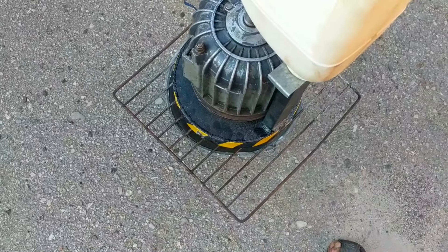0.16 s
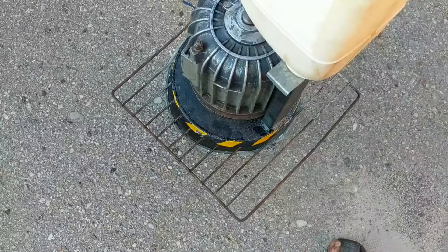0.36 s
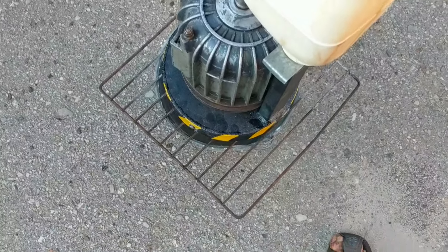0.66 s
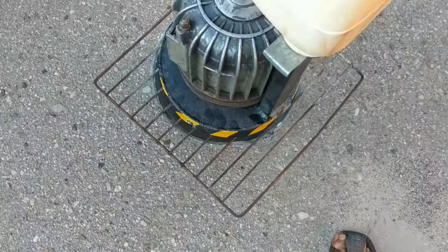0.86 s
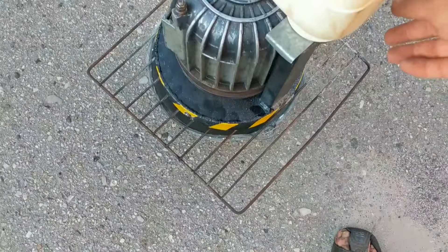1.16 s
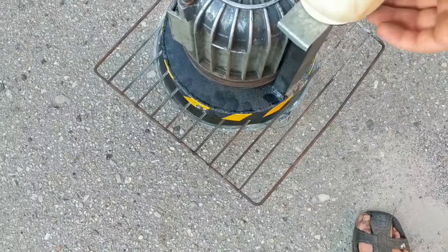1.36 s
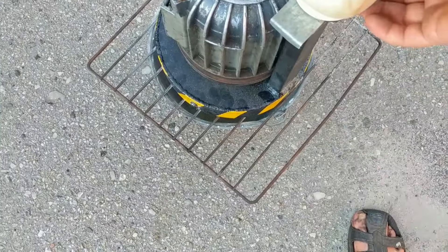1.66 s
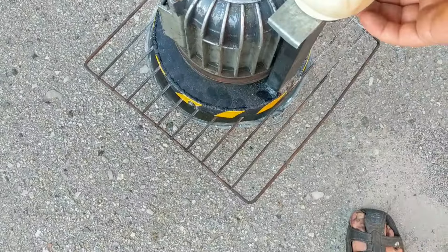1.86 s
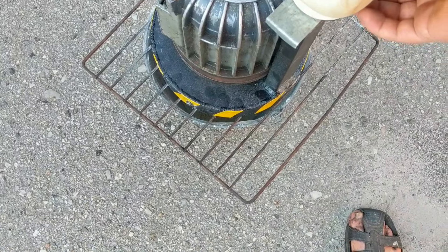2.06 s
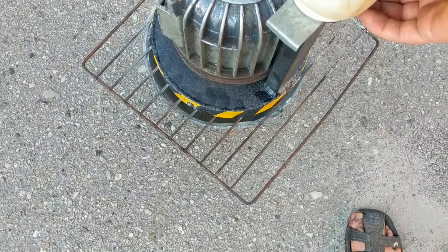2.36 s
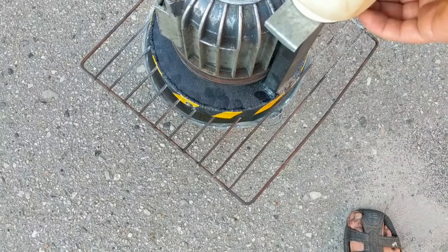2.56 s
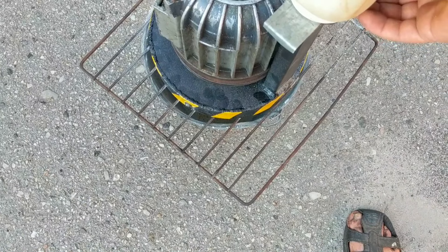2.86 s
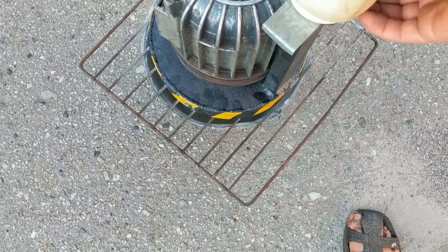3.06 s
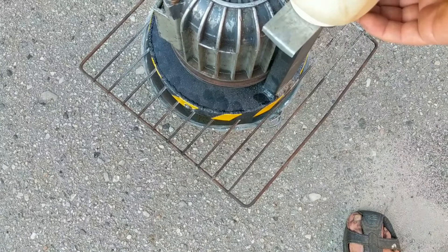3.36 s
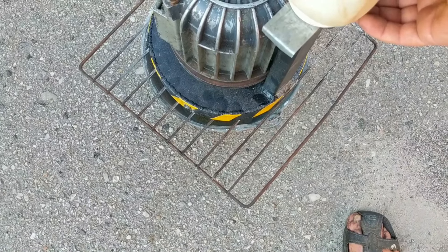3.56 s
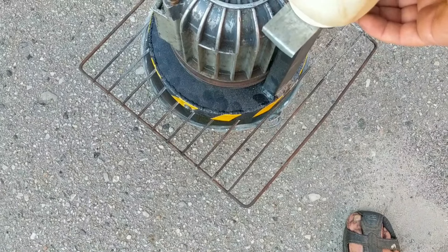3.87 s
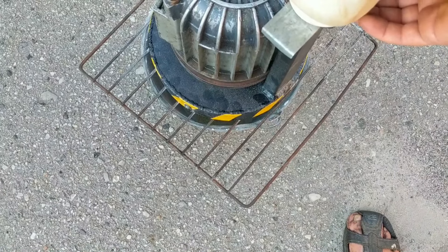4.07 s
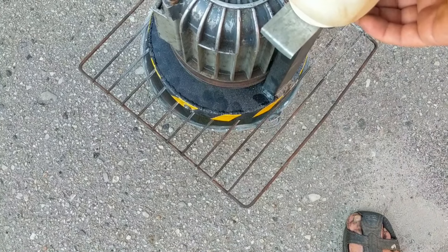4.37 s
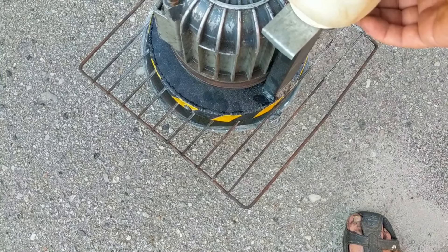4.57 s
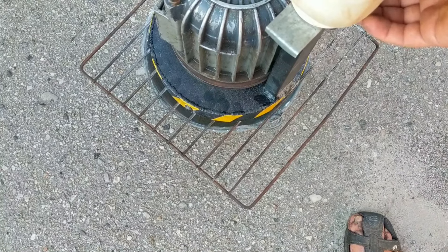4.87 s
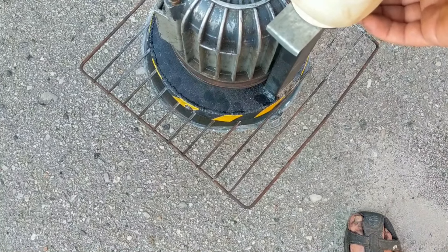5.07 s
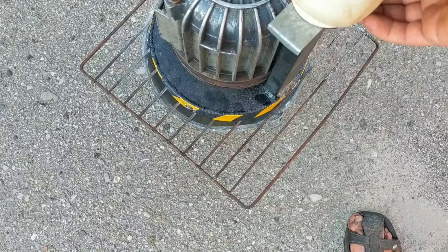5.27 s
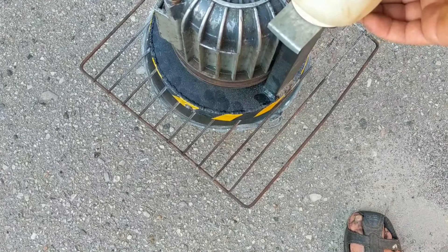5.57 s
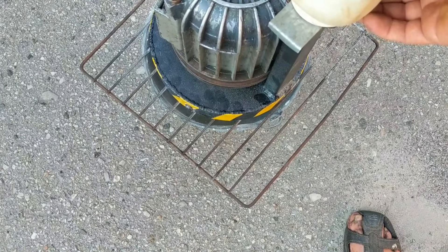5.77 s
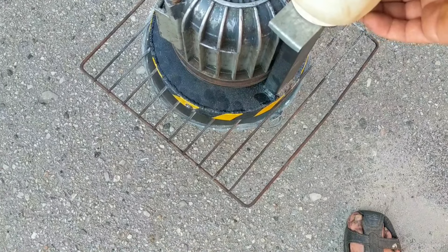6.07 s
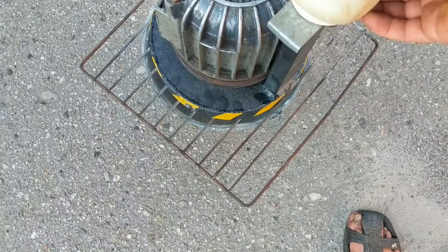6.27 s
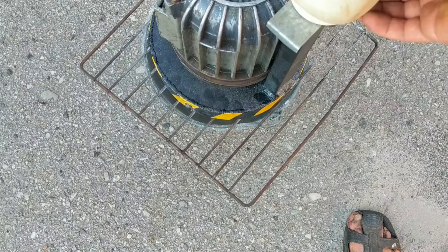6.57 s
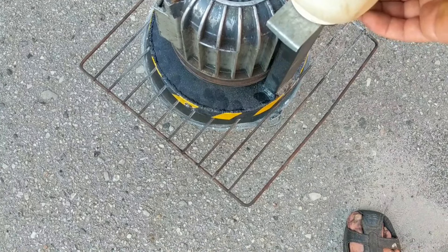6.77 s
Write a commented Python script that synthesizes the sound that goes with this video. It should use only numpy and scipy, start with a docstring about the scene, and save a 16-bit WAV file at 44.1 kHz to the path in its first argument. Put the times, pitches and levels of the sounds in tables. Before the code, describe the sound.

A homemade electric mill runs outdoors, heard from above through one microphone. At first a steady gritty, metallic hiss rides on a wavering motor hum, with isolated kernel cracks. Stepping closer brings brief, gliding metallic rings. The cracks gradually become more frequent, then at about four and a half seconds the feed opens and grain pours in, swelling to a loud, dense, rattling grind that lasts to the end.

```python
"""Electric grain mill, from single kernels to full feed

A homemade mill is heard from above, outdoors, through one microphone, as the listener steps closer.
Random blows and hiss, shaped by drum resonances, make the dust and chips swept round the steel.
Decaying bursts of the same noise crack single kernels, until the feed opens to a dense stream of corn.
Wavering sines and low noise make the motor; gliding bands of noise make rings that swell and pass."""
import sys
import numpy as np
from scipy import signal
from scipy.fft import rfft, irfft, next_fast_len
from scipy.io import wavfile
from scipy.ndimage import uniform_filter1d

SR = 44100
rng = np.random.default_rng(int(sys.argv[2]) if len(sys.argv) > 2 else 0)


def master(y):
    """Save y as 16-bit WAV."""
    cut = np.clip(np.atleast_2d(y).T, -1, 1)
    pcm = np.round(cut * 32767)  # scale
    wavfile.write(sys.argv[1], SR, pcm.astype(np.int16))


N = 305613
T = np.arange(N) / SR


def amp(db):
    """Decibels to gain."""
    return 10 ** (np.asarray(db) / 20)


def rms_one(x):
    """Scale to rms 1."""
    return x / np.sqrt(np.mean(x ** 2) + 1e-20)


def in_time(rows):
    """Turn a table whose first column is time into one curve per remaining column."""
    time_s, *columns = np.transpose(rows)
    return [np.interp(T, time_s, column) for column in columns]


def drift(rate_hz):
    """Slow random movement of rms 1: noise at every 40th sample through two equal one-pole low-passes."""
    r = np.exp(-80 * np.pi * rate_hz / SR)
    coarse = rng.standard_normal(N // 40 + 2002)
    slow = signal.lfilter([1], [1, -2 * r, r * r], coarse)[2000:]   # drop the filter's run-in
    return np.interp(np.arange(N) / 40, np.arange(len(slow)), rms_one(slow))


def wavering_tone(level_db, phase):
    """Sine whose level is given as rms."""
    return np.sqrt(2) * amp(level_db) * np.sin(phase)


def colour(x, spectrum, hollows=()):
    """Shape by a smooth spectrum with bell-shaped hollows."""
    size = next_fast_len(N)
    hz = np.maximum(np.arange(size // 2 + 1) * SR / size, 1)
    points = np.array(spectrum)
    db = np.interp(np.log(hz), np.log(points[:, 0]), points[:, 1])
    for at_hz, width_hz, depth_db in hollows:
        db = db + depth_db * np.exp(-(2 * (hz - at_hz) / width_hz) ** 2)
    return irfft(rfft(x, size) * amp(db), size)[:N]


def resonance(x, hz, width_hz):
    """Two-pole peak with gain 1 on top."""
    r = np.exp(-np.pi * width_hz / SR)
    poles = [1, -2 * r * np.cos(2 * np.pi * hz / SR), r * r]
    return signal.lfilter(np.array([1, 0, -1]) * (1 - r * r) / 2, poles, x)


# when each move begins and ends, in seconds
STEP_CLOSER_S, FEED_OPENS_S = (.68, 1.3), (4.45, 4.75)
TREBLE_TURNS_S = (1.45, 1.7)   # the modes above 7800 Hz come into view last


def by_state(far, close, full, step_s=STEP_CLOSER_S):
    """A value that passes from far to close as the listener steps up, then to full as the feed opens."""
    return np.interp(T, list(step_s) + list(FEED_OPENS_S), [far, close, close, full])


# broad colour of the blows: pitch_hz, relative level_db per Hz
RATTLE = [(150, -40), (250, 0), (399, -6.5), (483, 3), (574, -6.5), (855, -5), (1190, -5), (1620, 4.5),
          (3140, -1.5), (3420, -3), (4830, -3), (5270, -4.5), (7990, -4), (10700, -2), (15700, 4)]
# where the steel radiates little: pitch_hz, width_hz, gain_db
HOLLOWS = [(1270, 92, -0.5), (2420, 220, -1), (3107, 113, -6), (3710, 140, -1), (7980, 1360, -4),
           (8600, 140, 0), (10100, 120, -4), (12900, 500, -2), (13550, 250, -3), (15400, 400, -1)]


def stream_of_blows(per_s, spread_db, hiss):
    """Chips hit the steel at random with uneven force, over a hiss of flour and air."""
    force = amp(spread_db * np.minimum(rng.exponential(1, N), 5)) * rng.choice([-1, 1], N)
    hits = force * (rng.random(N) < per_s / SR)
    blows = rms_one(rms_one(hits) + hiss * rng.standard_normal(N))
    return colour(blows, RATTLE, HOLLOWS)


# edges of the five registers, body, lid, drum wall, grit and fine grit: pitch_hz
REGISTERS_HZ = [280, 1200, 3100, 7800, 11600, 17000]
# how much grain the rotor is beating, relative to the nearly empty mill: time_s, load_db
LOAD = [(0, 0), (.45, -1.5), (.75, -1), (1.6, 0.5), (3.0, 0), (4.45, -0.5), (4.6, 3), (4.75, 6.5), (4.9, 6),
        (5.05, 7), (5.2, 8), (5.4, 8.5), (5.47, 6.5), (5.55, 8), (5.9, 7), (5.98, 7), (6.2, 7.5),
        (6.3, 7.5), (6.45, 6.5), (6.55, 6), (6.7, 7), (6.93, 6.5)]
# roar of the nearly empty mill, one entry a register: level_db from further back, level_db close
ROAR_FAR_DB = [-44.5, -39, -35.5, -41.5, -45.5]
ROAR_CLOSE_DB = [-45, -42.5, -36.5, -41.5, -45.5]
# how far the roar follows the load, one entry a register: share (dB per dB)
ROAR_FOLLOWS = [0.91, 1.36, 1.134, 0.75, 0.91]
# modes of steel drum, lid and chute, one mode a column: pitch_hz
STEEL_HZ = [390, 482, 712, 840, 905, 1420, 1520, 1636, 1796, 1944, 2100, 2206, 2525, 2815, 3515, 3909, 4317,
            4578, 5150, 5302, 5490, 5943, 6280, 7140, 7270, 8600, 9560, 9780, 10220, 10380, 10922, 11060,
            11850, 12150, 12370, 13180, 13780, 14500]
# the same modes: width_hz
STEEL_WIDTH_HZ = [38.4, 46.3, 95, 36, 84.6, 30.2, 44, 74, 22, 37, 92, 37, 51, 130, 68, 246, 55, 35, 75.4,
                  95, 87, 32, 160, 60, 69.6, 300, 90, 120, 110, 90, 60, 70, 200, 50, 45, 45, 50, 400]
# mode gain beside the broad rattle, before levelling; rows: far_db, close_db, full_db (drum full of corn)
STEEL_DB = [
    [1.5, -3, 10.7, 1.9, 2.5, 4.9, 5.8, 9.4, 1.5, 12, 1.5, 1.1, 3.1, 5.1, 0.81, 4.3, 3.8, 1.3, 2.8, 12.4,
     2.4, 4.2, 2, 6, 1.2, -18, 0, 7, 5.7, 5, -8, 2, 0, -5, -5, 0, 0, -4],
    [1.5, 0, 5.9, 12.4, 5.4, 9.4, 1.6, 4.7, 1.3, 6.8, 3.1, 1.5, 4, 6.3, 6.8, 3.2, 5.3, 2.5, 6, 7.9, 2.6,
     1.5, 0.71, 6.5, 3.2, 2, 5, 6.5, 6.6, 7, 10, 4, -3, 4, 2, 6, 6, 1],
    [5, 0.5, 1.7, 0.5, 10, 7.5, 6.2, 7.3, 5.5, 6.3, 2.9, 2.4, 1.6, 0.41, 5.9, 1.9, 2.7, 3.2, 1, 7.2, 2, 2.5,
     1.2, 2.4, 4.4, 1, -2, 3, 1, 2, 2, 2, -1, -4, 4, 2, -2, 2],
]
SWEEP_HZ, SWEEP_DB = 49.75, .65   # two beaters on a shaft turning at half this rate


def mill(surge_db):
    """Each register of the steel is driven by the stream of blows plus the cracks."""
    phase = 2 * np.pi * SWEEP_HZ * T + .3 * drift(1)
    sweep = np.cos(phase) + .5 * np.cos(2 * phase) + .12 * np.cos(3 * phase)   # the beaters pass the chute
    surge = surge_db * drift(30) + SWEEP_DB * sweep   # grain arrives in clumps
    stream = stream_of_blows(per_s=5000, spread_db=3.5, hiss=1.3)
    load_db, cracks = in_time(LOAD)[0], all_cracks()
    out = np.zeros(N)
    for k, (far, close, share) in enumerate(zip(ROAR_FAR_DB, ROAR_CLOSE_DB, ROAR_FOLLOWS)):
        low, high = REGISTERS_HZ[k:k + 2]
        level_db = by_state(far, close, close) + share * load_db
        steady = amp(2 * (level_db + surge + .96 * drift(20.3)))   # doubled dB: power
        power = steady + crack_power(cracks, k)
        sound = np.sqrt(power) * stream
        step_s = TREBLE_TURNS_S if k > 2 else STEP_CLOSER_S
        for hz, width_hz, far_db, close_db, full_db in zip(STEEL_HZ, STEEL_WIDTH_HZ, *STEEL_DB):
            if low <= hz < high:
                mode_db = by_state(far_db, close_db, full_db, step_s)
                flicker = amp(4.5 * drift(16) + 1.5 * drift(1.5))   # chips land now here, now there
                drive = steady * flicker + crack_power(cracks, k, mode_hz=hz, favour_db=12.5)
                sound += amp(mode_db) * resonance(np.sqrt(drive) * stream, hz, width_hz)
        band = signal.sosfilt(signal.butter(4, [low, high], "band", fs=SR, output="sos"), sound)
        # over half a second the register keeps its level, whichever modes carry it
        wanted = uniform_filter1d(power, size=SR // 2)
        present = uniform_filter1d(band ** 2, size=SR // 2)
        out += band * np.sqrt(wanted / present)
    return out


# wavering motor tones, one a column; several lie about one shaft turn apart and beat: pitch_hz
HUM_HZ = [100, 192.8, 199.96, 217.65, 224.8, 232.1, 242.5, 256.9, 323, 463, 646, 705, 722, 770, 1944, 2787,
          2810, 5040]
# the same tones, rms before waver and swell; rows: far_db, close_db, full_db (under load)
HUM_DB = [
    [-67, -59.5, -65, -60, -67, -71, -74, -76, -78, -60, -61, -63, -58, -72, -67, -70, -72, -73],
    [-70, -58.5, -61.5, -60, -65, -73, -76, -67, -68, -58, -61, -67, -64, -63, -56.5, -60, -57, -77],
    [-77, -68.5, -63, -68, -62.5, -66, -64, -60.5, -57, -54, -59, -55, -54.5, -66, -51, -66, -73, -50],
]
# the same tones, rms of the level's random waver: waver_db
HUM_WAVER_DB = [2.5, 1, 1, 1, 1, 1, 1, 1, 3, 3, 4, 3, 3, 3,  3, 3, 3, 3, 3]
# clearest motor tone, rms before waver: time_s, level_db
WHINE = [(0, -57), (.3, -62), (.8, -56), (1.1, -51), (1.25, -62), (1.55, -54), (1.9, -58), (2.2, -54),
         (2.7, -51), (2.85, -62), (3.05, -51), (3.75, -52), (3.9, -61), (4.2, -55), (4.5, -56), (4.7, -66),
         (6.93, -66)]
# deep tone that comes and goes, rms before waver: time_s, level_db
LOW_HUM = [(0, -72), (.25, -72), (1.2, -68), (1.4, -64.5), (3.65, -64), (4.0, -73), (6.93, -78)]
# rumble colour: pitch_hz, relative level_db per Hz
RUMBLE = [(12, -48), (20, -21), (65, -12.5), (140, -7), (199, -5), (227, 0), (283, -11.5), (330, -42),
          (430, -79), (730, -120)]
# the motor's voice swells and sinks slowly: time_s, tones_db, rumble_db
MOTOR_SWELL = [(0, -1, 0), (1.1, -2, 3.5), (1.9, -1.5, 2), (2.4, -1.5, 2), (3.7, -2.5, 1.5), (4.2, -1.5, 6),
               (5.0, -4, -1), (5.8, 1.5, 0), (6.4, -0.5, 0), (6.93, -0.5, 0)]
WHINE_HZ, LOW_HUM_HZ = 488.5, 61
RUMBLE_DB, RUMBLE_FOLLOWS = -59.5, .88   # rms before load, swell and lumps; dB per dB of load
THROB_PEAK_S = .07   # the beating tones near 200 Hz first meet here


def motor():
    """Beating tones over a lumpy rumble that grows with the load."""
    tones_swell_db, rumble_swell_db = in_time(MOTOR_SWELL)
    wander = .5 * drift(2)   # radians, shared by the tones and the whine
    tones = np.zeros(N)
    for hz, waver_db, *state_db in zip(HUM_HZ, HUM_WAVER_DB, *HUM_DB):
        level_db = by_state(*state_db) + waver_db * drift(4.3)
        phase = 2 * np.pi * hz * (T - THROB_PEAK_S) + wander + .087 * waver_db * drift(5.1)
        tones += wavering_tone(level_db, phase)
    whine_phase = 2 * np.pi * WHINE_HZ * T + wander + .5 * drift(9)
    whine = wavering_tone(in_time(WHINE)[0] + 1.3 * drift(11), whine_phase)
    deep_phase = 2 * np.pi * LOW_HUM_HZ * T + .69 * drift(2.5)
    deep = wavering_tone(in_time(LOW_HUM)[0] + 2.5 * drift(6), deep_phase)
    lumps_db = 2.5 * drift(16)
    rumble_db = RUMBLE_DB + RUMBLE_FOLLOWS * in_time(LOAD)[0] + rumble_swell_db + lumps_db
    rumble = rms_one(colour(rng.standard_normal(N), RUMBLE)) * amp(rumble_db)
    return amp(tones_swell_db) * tones + whine + deep + rumble


def gliding_noise(white, hz, width_hz):
    """Two low-passed noises on a cosine and a sine carrier make a narrow band round a moving centre."""
    n = len(hz)
    low_pass = signal.butter(2, width_hz / 2, fs=SR, output="sos")
    swing = signal.sosfilt(low_pass, white)[:, -n:]
    turn = 2 * np.pi * np.cumsum(hz) / SR
    return rms_one(swing[0] * np.cos(turn) + swing[1] * np.sin(turn))


# rough rings that pass while the listener moves over the mill, level before the swell:
# start_s, end_s, from_hz, to_hz, width_hz, level_db
PASSING_RINGS = [(0.23, .48, 10000, 9200, 200, -46), (0, .76, 722, 717, 14, -47.5),
                 (.08, .22, 718, 722, 20, -47), (.28, .42, 730, 715, 40, -48),
                 (.56, .72, 720, 705, 40, -44.5), (.8, 1.4, 720, 700, 55, -50.5),
                 (.1, 0.43, 6700, 5900, 400, -50), (.42, .62, 11800, 11760, 330, -52),
                 (.45, 0.8, 5900, 6100, 200, -45), (.62, 0.72, 1300, 1330, 140, -43),
                 (0.56, 1.1, 3300, 3200, 200, -46.5), (0.61, 0.86, 3870, 4030, 160, -39),
                 (.7, 0.83, 4300, 4400, 350, -42), (.6, .85, 8300, 7800, 650, -47),
                 (.7, 0.77, 10500, 9900, 400, -40.5), (.88, 1.2, 2200, 2200, 450, -42.5),
                 (.82, 1.03, 6100, 6200, 180, -44), (0.9, 1.1, 7400, 8400, 800, -47),
                 (.93, 1.34, 7200, 6400, 300, -47), (.98, 1.05, 10600, 9700, 300, -50),
                 (1.12, 1.25, 11300, 11700, 500, -50), (1.0, 1.65, 11900, 11850, 250, -59),
                 (.85, 1.2, 13900, 13300, 800, -56), (1.3, 1.62, 11000, 9650, 350, -51),
                 (1.17, 1.3, 5950, 5300, 200, -45)]


def passing_rings():
    """Narrow bands of noise about a gliding centre, swelling and fading."""
    out = np.zeros(N)
    for start_s, end_s, from_hz, to_hz, width_hz, level_db in PASSING_RINGS:
        start = round(start_s * SR)
        n = round(end_s * SR) - start
        white = rng.standard_normal((2, SR))
        ring = gliding_noise(white, np.linspace(from_hz, to_hz, n), width_hz)
        swell = np.sqrt(np.sin(np.pi * np.arange(n) / n))
        out[start:start + n] += amp(level_db) * swell * ring
    return out


# a crack's share in each register, one entry a register: gain_db
CRACK_DB = [-31, -16.5, -11, -14.5, -21.5]
CRACK_RISE_S = .0013
SNAP_DB, SNAP_S = 2.5, .003   # the first instant of a crack is the hardest
CRACK_HOME_DB = .5   # more in the register that rings


def crack_power(cracks, register, mode_hz=None, favour_db=0):
    """Power envelope of the cracks: fragments fly for some milliseconds and favour the modes where they land."""
    power = np.zeros(N)
    low, high = REGISTERS_HZ[register:register + 2]
    for start_s, level_db, ring_hz, bright_db, t60_s in cracks:
        start = round(start_s * SR)
        t = T[:round(t60_s * SR)]
        decay_db = -60 * t / t60_s + SNAP_DB * np.exp(-t / SNAP_S)
        shape = (1 - np.exp(-t / CRACK_RISE_S)) * amp(decay_db)
        tilt_db = bright_db * (register - 1.5)
        home_db = CRACK_HOME_DB * (low <= ring_hz < high)
        db = level_db + CRACK_DB[register] + tilt_db + home_db
        near = np.exp(-(np.log(mode_hz / ring_hz) / .05) ** 2) if mode_hz else 0
        power[start:start + len(t)] += (amp(db + favour_db * near) * shape[:N - start]) ** 2
    return power


# the clearest kernels cracking, level before each register's share; the steel rings most near ring_hz:
# start_s, level_db, ring_hz, brightness_db per register, t60_s
CRACKS = [(0.0353, -26, 5300, -3, 0.069), (0.2754, -24, 5300, -3, 0.085), (0.5043, -20, 5950, -1, 0.093),
          (0.5364, -20.5, 3820, -4, 0.071), (1.0181, -24, 5260, 2.5, 0.076), (1.2241, -18, 5930, -1, 0.048),
          (1.3574, -23, 5430, -4, 0.091), (1.545, -13.5, 3530, -8, 0.044), (1.8894, -21, 5150, 0, 0.081),
          (1.9774, -24.5, 5230, 0, 0.085), (2.2384, -25, 5310, 3.5, 0.049), (2.321, -20, 7140, -2, 0.07),
          (2.452, -24, 5300, -1, 0.062), (2.7184, -20, 1640, -4, 0.049), (3.1018, -18, 1670, 1, 0.085),
          (3.1134, -18.5, 3910, -4, 0.11), (3.2191, -20.5, 5300, -1.5, 0.2),
          (3.2844, -17.5, 9800, 1.5, 0.075), (3.5109, -17.5, 5560, 1, 0.09), (3.5414, -22, 4380, -4, 0.07),
          (3.6606, -19, 10900, -3, 0.14), (3.7824, -25, 5300, -0.5, 0.1), (4.0113, -22, 3500, 1, 0.071),
          (4.04, -18, 3510, -3, 0.076), (4.1224, -21.5, 5300, -8, 0.094), (4.326, -18.5, 1640, -1, 0.098),
          (4.3904, -22, 1650, -2, 0.083), (4.435, -14.5, 2206, -3, 0.05), (4.442, -20.5, 5500, -1.5, 0.12),
          (4.497, -28, 2815, -3, 0.03), (4.527, -18.5, 3930, 2, 0.086), (4.5463, -10.5, 3910, -5, 0.13),
          (4.5704, -16, 1450, 1.5, 0.14), (4.6304, -15.5, 1740, -2, 0.085), (4.6934, -18, 4610, -1, 0.11),
          (4.733, -12, 1530, -4, 0.068), (4.7875, -9.5, 4320, -6, 0.068),
          (4.8305, -11.5, 1410, -0.5, 0.069), (4.9023, -13.5, 1460, -1.5, 0.076),
          (4.9314, -17.5, 5330, -11.5, 0.085), (4.9694, -16.5, 3770, -12, 0.091),
          (5.0884, -16.5, 1640, 1, 0.085), (5.1304, -18, 5480, 1, 0.078), (5.1674, -27, 3470, -1, 0.067),
          (5.1944, -27, 3930, 0, 0.085), (5.228, -17, 1640, -7, 0.06), (5.238, -15, 3700, 1, 0.05),
          (5.257, -16, 1640, -4, 0.06), (5.28, -15, 1640, -4, 0.1), (5.318, -14, 4317, -3, 0.08),
          (5.3374, -14, 2190, -7, 0.069), (5.4924, -20, 1640, -6, 0.077), (5.5874, -17, 1640, -5, 0.056),
          (5.643, -10.5, 1630, -2.5, 0.059), (5.7, -24, 1000, -14, 0.08), (5.782, -14, 2850, -8, 0.11),
          (5.828, -18.5, 1520, -14, 0.077), (5.84, -21, 482, -15.5, 0.055), (5.8604, -21, 1660, -7, 0.085),
          (6.0194, -17, 1640, -2, 0.081), (6.058, -19, 1630, -12, 0.085), (6.1514, -21, 1660, 0, 0.11),
          (6.1873, -10.5, 1720, -11, 0.1), (6.2477, -21, 4290, -2, 0.085),
          (6.5304, -15.5, 1640, -11, 0.044), (6.667, -13, 1940, -9, 0.062), (6.7354, -18, 5270, -3, 0.068),
          (6.829, -15, 1630, -9, 0.054)]
SMALL_CRACKS_PER_S, SMALL_CRACK_DB, SMALL_T60_S = 14, -28, .05


def all_cracks():
    """The clear cracks, small ones at random moments, and splinters once the feed is open."""
    count = round(SMALL_CRACKS_PER_S * N / SR)
    small = random_cracks(count, 0, SMALL_CRACK_DB, SMALL_T60_S)
    return list(CRACKS) + small + splinters()


def random_cracks(count, from_s, base_db, t60_s):
    """Cracks at random moments, landing anywhere from 1400 to 7000 Hz, louder with the load."""
    draw = rng.random((count, 4))
    start_s = from_s + draw[:, 0] * (N / SR - from_s)
    load_db = np.interp(start_s, *np.transpose(LOAD))
    level_db = base_db + load_db + 3 * (2 * draw[:, 1] - 1)   # within 3 dB either way
    ring_hz = 1400 * 5.0 ** draw[:, 2]
    bright_db = 5 * draw[:, 3] - 4
    return list(zip(start_s, level_db, ring_hz, bright_db, np.full(count, t60_s)))


# one ring that climbs while the listener moves: time_s, pitch_hz, level_db
CLIMBING_RING = [(.3, 2540, -63.5), (.55, 2592, -52), (.7, 2600, -44), (.85, 2657, -46), (.96, 2685, -42),
                 (1.05, 2725, -47), (1.15, 2790, -40), (1.2, 2970, -43), (1.25, 3110, -45),
                 (1.28, 3150, -70)]


def climbing_ring():
    """A narrow band of noise whose centre rises along the table, then stops."""
    hz, level_db = in_time(CLIMBING_RING)
    ring = gliding_noise(rng.standard_normal((2, N)), hz, width_hz=150)
    return amp(level_db) * (T < CLIMBING_RING[-1][0]) * ring


def splinters():
    """Short ticks scattered at random once the feed is open."""
    return random_cracks(170, FEED_OPENS_S[1], base_db=-27, t60_s=.025)


def scene():
    """Mill, rings and motor reach one microphone that feeds both channels."""
    ring_lumps = amp(1.5 * drift(15))
    rings = (passing_rings() + climbing_ring()) * ring_lumps
    heard = mill(surge_db=.29) + rings + motor()
    return np.stack([heard, heard])


# the level dips twice, briefly: time_s, gain_db
STUTTER = [(1.2428, 0), (1.2432, -18), (1.2445, -18), (1.2452, 0), (1.2468, 0), (1.2472, -14), (1.250, -9),
           (1.256, 0)]
PEAK_TOP, CUTOFF_HZ = .4, 15730   # PEAK_TOP is the ceiling of the rounding, as amplitude


def record(dry):
    """Two brief dips in level, rounded peaks, and the top cut steeply."""
    dipped = dry * amp(in_time(STUTTER)[0])
    rounded = PEAK_TOP * np.tanh(dipped / PEAK_TOP)
    top_cut = signal.ellip(14, .5, 75, CUTOFF_HZ, fs=SR, output="sos")   # .5 dB ripple, 75 dB down
    return signal.sosfilt(top_cut, rounded)


dry = scene()
out = record(dry)
master(out)
```